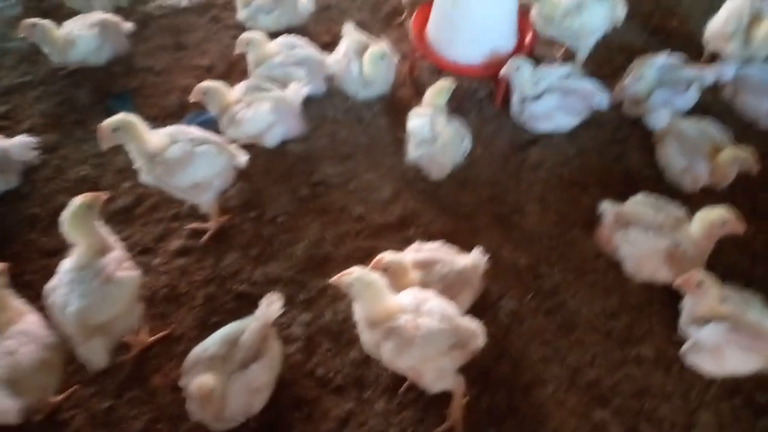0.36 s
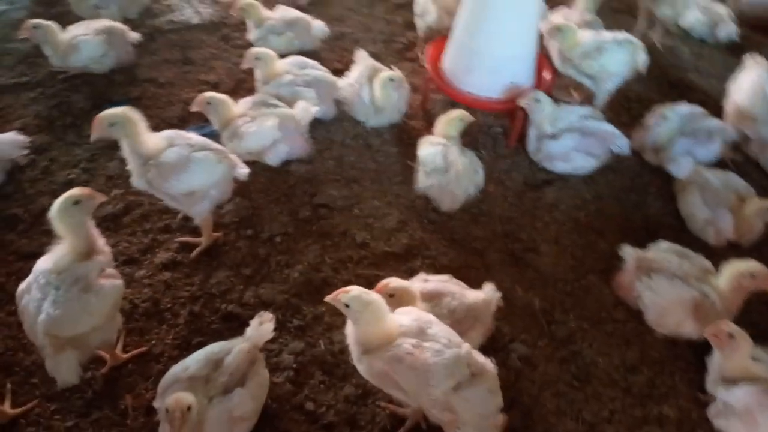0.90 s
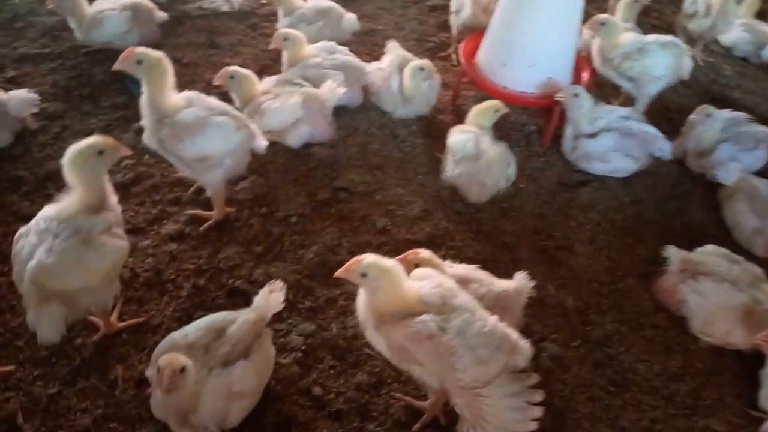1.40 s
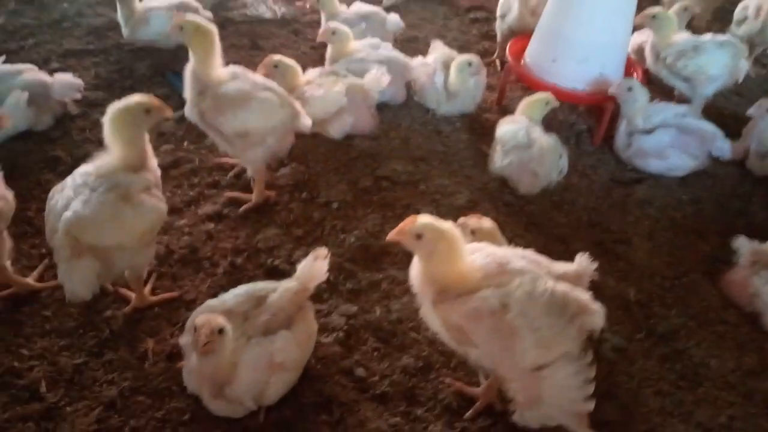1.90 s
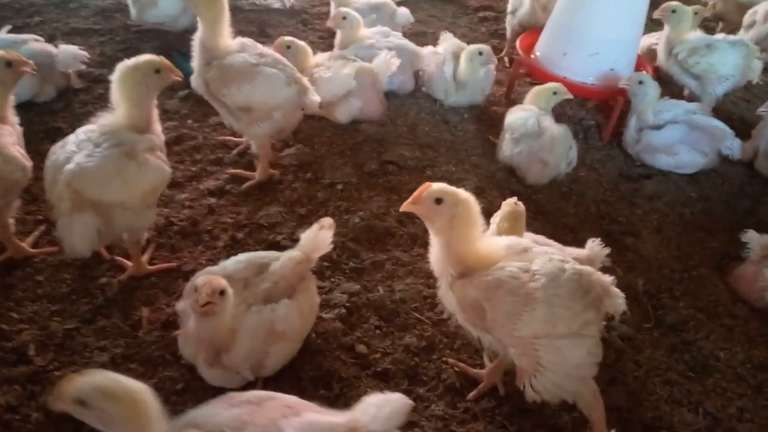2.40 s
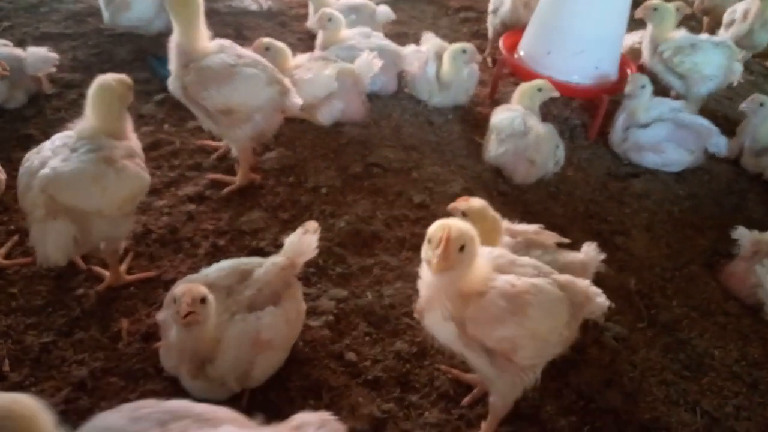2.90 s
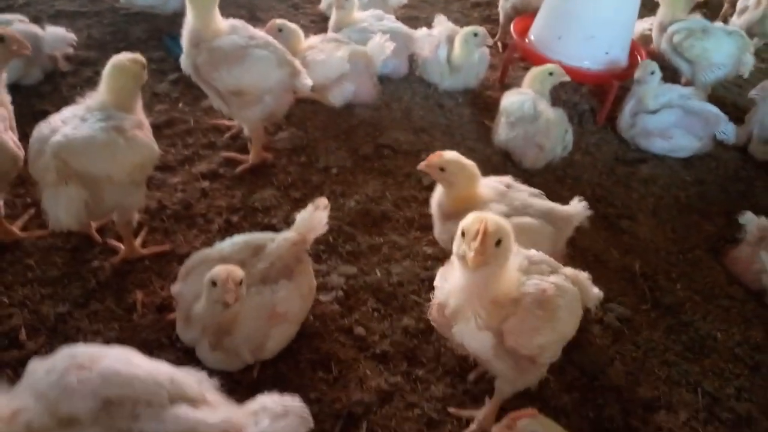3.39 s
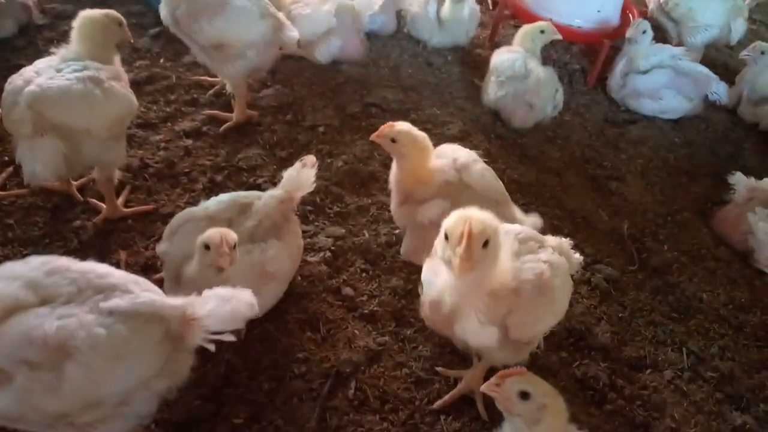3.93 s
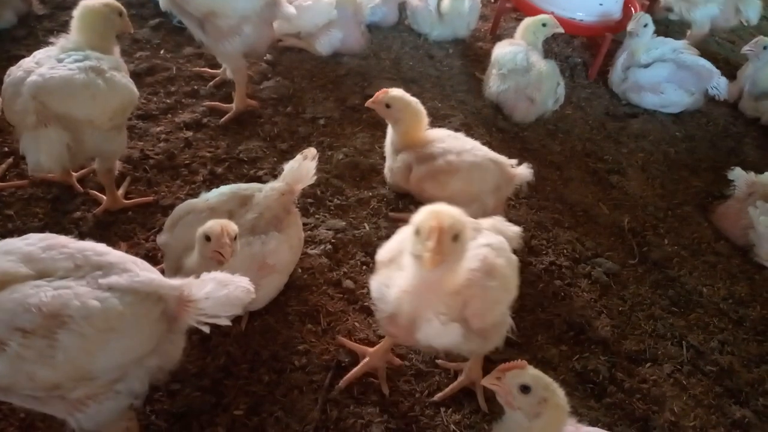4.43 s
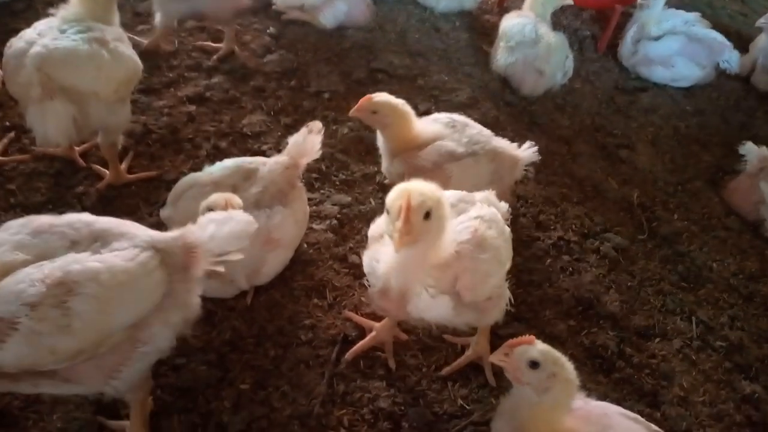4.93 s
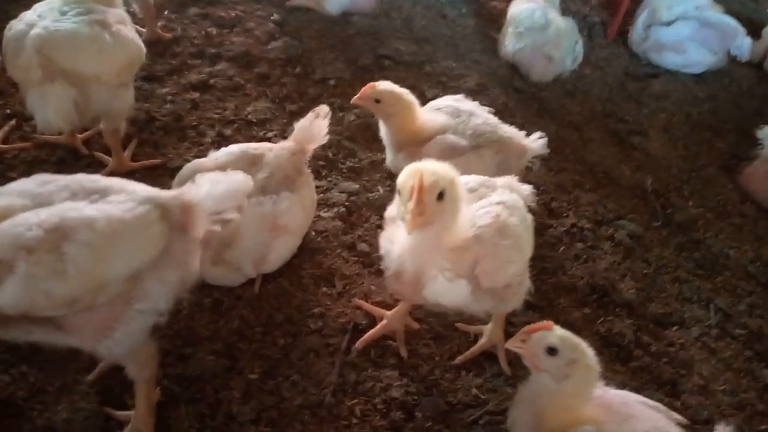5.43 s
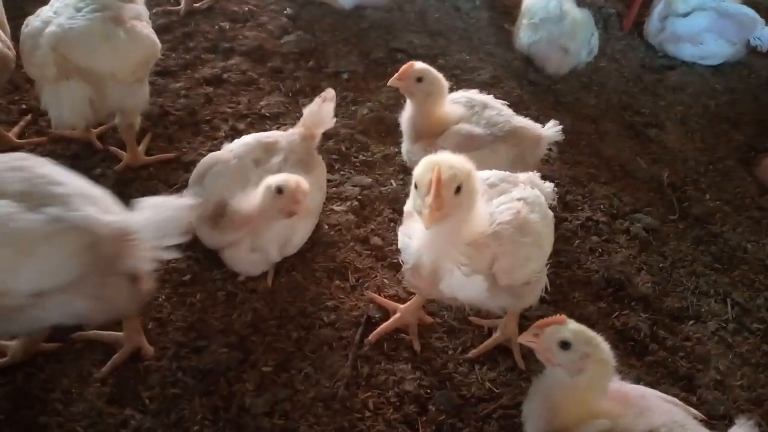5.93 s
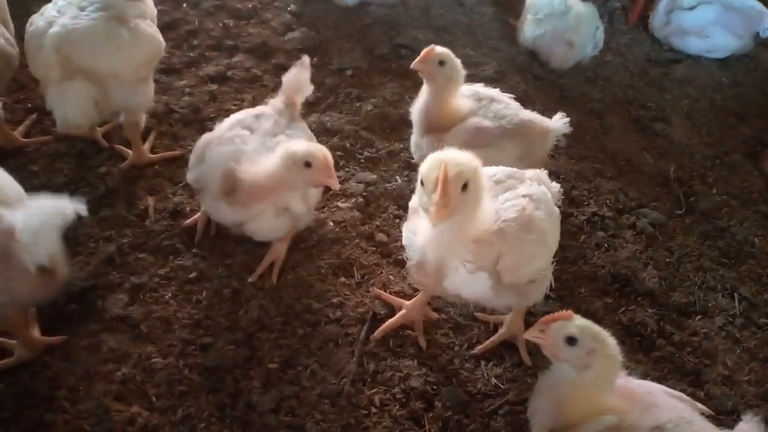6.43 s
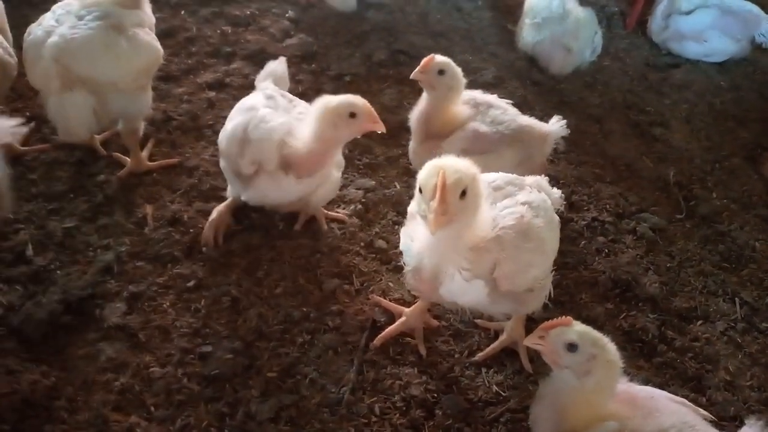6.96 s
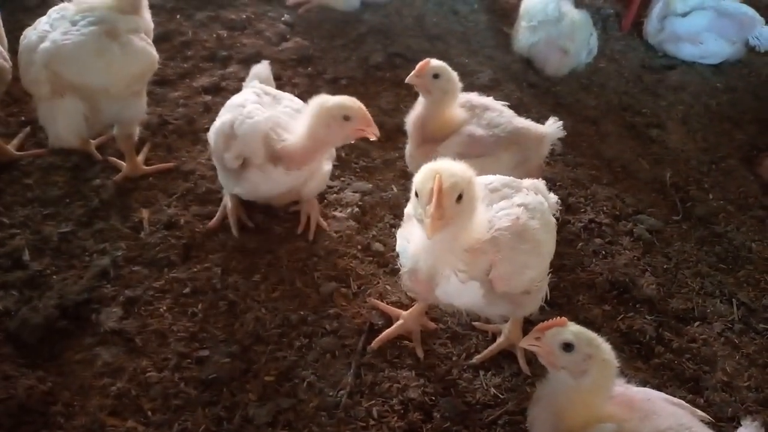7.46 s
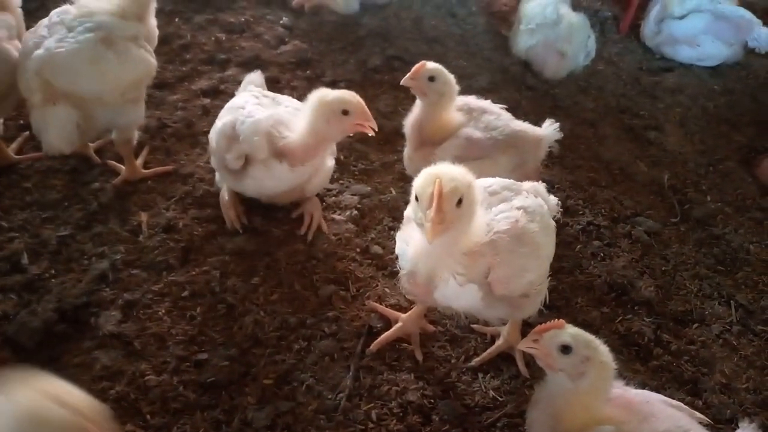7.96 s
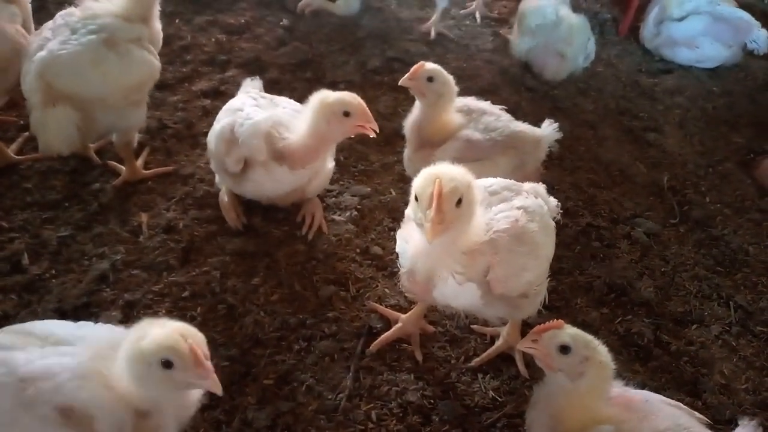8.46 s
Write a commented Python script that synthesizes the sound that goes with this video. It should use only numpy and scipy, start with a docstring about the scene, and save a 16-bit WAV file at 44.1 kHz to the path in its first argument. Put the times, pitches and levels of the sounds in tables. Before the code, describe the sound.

A flock of young chickens peeps throughout in a farm shed, its distant blur of tiny falling whistles swelling and briefly dipping over faint low air and hiss. From 0 to 1 s, thin quick cheeps sound nearer, with a barely audible low hoot. From 1 to 2.2 s, soft body thuds, feather and litter rustles and small knocks mix with hoarse, rapidly fluttering trills. A clearer trill comes at 2.6 s, then a lull. Between 3.2 and 4.9 s, sharp short clucks punctuate rough trills and peeps. At 5.0 a longer trill leads into the busiest moment, 5.3 to 5.7 s, with strong clucks and bumps. Around 6 to 6.8 s come more soft knocks and dry rustling. Then sparse peeps, a faint low purr near 7 s and distant hoots near 8 s, ending with a knock at 8.4 and a louder cluster of cheeps at 8.55 s.

```python
"""A blur of small voices in a farm shed, then young chicks peeping, clucking and trilling near the microphone.
Peeps and clucks are short bent glides; trills dip fifty times a second and grow hoarse with half-pitch lines.
The far flock is 900 small peeps blurred by the shed. Noise makes the rustling litter, the air and the hiss;
damped sines make soft knocks, short noise bursts dry ticks. A low bird hoots and purrs faintly far off."""
import sys
import numpy as np
from scipy import signal
from scipy.fft import rfft, irfft
from scipy.io import wavfile
from scipy.ndimage import uniform_filter1d

SR = 44100
rng = np.random.default_rng(int(sys.argv[2]) if len(sys.argv) > 2 else 0)


def volts(x):
    """Linear amplitude factor 10**(x/20) for a level x in dB, scalar or array-like."""
    e = np.asarray(x, float) / 20
    return 10 ** e


def materialize(psi):
    """Save the field psi as 16-bit PCM at rate SR to the path in sys.argv[1].

    A 1-D psi becomes a single channel; in a 2-D psi each row is a channel.
    """
    bounded = np.clip(np.atleast_2d(psi).T, -1, 1)
    quanta = np.round(bounded * 32767).astype(np.int16)
    wavfile.write(sys.argv[1], SR, quanta)


N = 378819


def rms_one(x):
    """Scale to rms 1."""
    return x / np.sqrt(np.mean(np.abs(x) ** 2) + 1e-20)


def add(out, at, sound):
    """Mix a short sound in at a sample."""
    out[at:at + len(sound)] += sound[:max(N - at, 0)]


def drift(rate_hz, size):
    """Slow chance of rms 1: noise steeply low-passed at a rate."""
    sos = signal.butter(4, rate_hz, fs=SR, output="sos")
    return rms_one(signal.sosfilt(sos, rng.standard_normal(size + 3000))[3000:])


def coloured(spectrum, patchy_db):
    """Noise of a given spectrum, rms 1; bands two thirds of an octave apart flicker independently."""
    f = np.fft.rfftfreq(N, 1 / SR) + 1
    hz, level_db = np.transpose(spectrum)
    tone = rfft(rng.standard_normal(N)) * volts(np.interp(np.log(f), np.log(hz), level_db))
    knots = np.arange(N // 441 + 2)   # one every 10 ms
    out = 0
    for k in range(1, 15):
        share = np.clip(1 - np.abs(1.5 * np.log2(f / 30) - k), 0, 1)
        flicker = np.interp(np.arange(N) / 441, knots, rng.standard_normal(len(knots)))
        out = out + irfft(tone * share, N) * volts(patchy_db * flicker)
    return rms_one(out)


def swell(t, rise_s, length_s, change_db, release_s):
    """Smooth rise and release around a level that slopes in dB over the length."""
    rise = np.clip(t / rise_s, 0, 1)
    release = np.clip((length_s - t) / release_s, 0, 1)
    edges = np.sin(np.pi / 2 * rise) ** 2 * np.sin(np.pi / 2 * release) ** 2
    return edges * volts(change_db * t / length_s)


def span(rows):
    """First sample, times, end fades and the interpolated columns of a short curve."""
    s, *columns = np.transpose(rows)
    t = np.arange(round(s[0] * SR), min(round(s[-1] * SR), N)) / SR
    fade = np.clip(np.minimum(t - s[0], s[-1] - t) / 0.018, 0, 1)
    return round(s[0] * SR), t, fade, [np.interp(t, s, c) for c in columns]


def shed(x):
    """The shed's answer: a diffuse noise tail that dies away, with the energy of the sound that enters."""
    t60_s = 0.092
    t = np.arange(int(.5 * SR)) / SR
    tail = rng.standard_normal(len(t)) * volts(-60 * t / t60_s) * (t > .004)
    return signal.fftconvolve(x, tail / np.sqrt(np.sum(tail ** 2)))[:N]


def microphone_hiss():
    """Steady faint noise of the microphone, its bands flickering a little."""
    # Spectrum of the hiss. Each row: frequency in Hz, density in dB per Hz (relative).
    hiss_spectrum = [(3000, -12.5), (8000, -14.5), (13000, -17.5), (14500, -2.5), (15700, -0.5)]
    return volts(-86) * coloured(hiss_spectrum, patchy_db=2.0)


def room_air():
    """The air of the shed: mostly low noise that flickers band by band."""
    # Spectrum of the air. Each row: frequency in Hz, density in dB per Hz (relative).
    air_spectrum = [(25, -52.5), (50, -21), (80, 0), (120, -4.5), (300, -13), (600, -20), (1400, -19.5),
                    (3500, -29.5), (7000, -34.5)]
    return volts(-76) * coloured(air_spectrum, patchy_db=3.5)


def peep(length, pitch_hz, overtone_db, fall_db):
    """A whistle on a bent glide (pitch at start, middle, end) with overtones that change by fall_db each."""
    u = np.linspace(-.15, 1.15, int(1.3 * length * SR) + 2)   # runs past both ends of the length
    a, b, c = pitch_hz
    glide = a + (4 * b - 3 * a - c) * u + (2 * a - 4 * b + 2 * c) * u * u
    phase = 2 * np.pi * np.cumsum(glide) / SR
    envelope = np.sin(np.pi * np.linspace(0, 1, len(u)) ** .8) ** 1.2
    voice = envelope * np.sin(phase)
    for k in range(2, 6):
        voice = voice + envelope ** k * np.sin(k * phase) * volts(overtone_db + fall_db * (k - 2))
    return np.sqrt(2) * voice   # the whistle has rms 1 at its crest


def flock():
    """Hundreds of short falling peeps, loud and faint, blurred by the shed; one in ten is a faint low cluck."""
    # Loudness of the far flock. Each row: time in seconds, level in dB before a lift of 1.5 dB.
    flock_level = [(0, -61), (.3, -55), (.75, -58), (1.17, -62.5), (1.6, -57.5), (1.799, -63.5),
                   (2.451, -62), (3.0, -57.5), (3.2, -52.5), (3.501, -55.5), (3.7, -64), (3.95, -53.5),
                   (4.4, -54), (4.72, -59.5), (5.3, -50), (5.64, -64.5), (6.3, -59.5), (6.58, -62),
                   (6.85, -62.5), (7.05, -55), (7.4, -58), (7.77, -61), (8.2, -57.5), (8.45, -64),
                   (8.588, -44)]
    # Brief dips in the flock's level, as from a noise gate.
    # Each row: middle in seconds, half length in seconds, depth in dB.
    level_dips = [(0.186, 0.06, 29), (0.248, 0.029, 13), (1.17, 0.13, 5), (2.572, 0.044, 10.5),
                  (3.084, .1, 13.5), (3.731, 0.038, 15), (4.224, 0.04, 11), (5.528, 0.027, 29),
                  (6.222, 0.077, 18), (6.297, 0.1, 28), (6.729, 0.099, 35), (7.212, 0.12, 8.5),
                  (7.494, 0.068, 17), (7.637, 0.058, 16), (7.934, 0.072, 22), (8.224, 0.028, 14)]
    out = np.zeros(N)
    for s, length, top, fall, bend, near, kind, size in rng.random((900, 8)):
        top_hz, fall_hz = 2050 + 620 * (top + size), 750 * fall + 50
        glide = np.array([top_hz, top_hz - fall_hz * (.2 + .6 * bend), top_hz - fall_hz])
        low = kind < 1 / 10   # half the pitch, half the length
        note = peep((.018 + .04 * length) / (1 + low), glide / (1 + low), -35, -20)
        add(out, int(s * N), volts(18 * near - 12 * low) * note)
    out = out * volts(3.2 * drift(110, N))   # small throats waver
    out = out + volts(5) * shed(out)
    out /= np.sqrt(uniform_filter1d(out ** 2, size=4000)) + 1e-9   # the crowd keeps an even loudness
    t = np.arange(N) / SR
    s, level_db = np.transpose(flock_level)
    dip_db = sum(depth_db * np.clip(1 - np.abs(t - mid) / half, 0, 1) for mid, half, depth_db in level_dips)
    return out * volts(np.interp(t, s, level_db) + 1.5 - dip_db)


def hoots():
    """Far low hoots near 700 Hz: wavering sines with a faint octave."""
    # One curve per phrase. Each row: time in seconds, pitch in Hz, level in dB.
    phrases = [
        [(.1, 785, -85), (.2, 728, -80), (.26, 710, -78)],
        [(.74, 830, -88), (.87, 760, -77), (.95, 745, -89)],
        [(1.06, 810, -65), (1.2, 795, -74), (1.3, 837, -66.5)],
        [(7.52, 700, -79), (7.57, 810, -74.5), (7.62, 830, -78)],
        [(7.71, 600, -64.5), (7.76, 684, -73), (7.82, 810, -77), (7.92, 770, -77.5), (8.06, 746, -78),
         (8.15, 673, -67.5), (8.22, 556, -77)],
    ]
    out = np.zeros(N)
    for rows in phrases:
        at, t, fade, (hz, level_db) = span(rows)
        phase = 2 * np.pi * np.cumsum(hz) / SR
        waver = 1 + .7 * drift(45, len(t))
        add(out, at, fade * volts(level_db) * waver * (np.sin(phase) + .35 * np.sin(2 * phase)))
    return out


def purr():
    """A low far purr: an unsteady sine that throbs fast."""
    # Course of the purr. Each row: time in seconds, pitch in Hz, level in dB before a lift of 6.5 dB.
    purr_curve = [(6.7, 691, -66), (7.338, 632, -77.5), (7.37, 583, -99)]
    throbs_per_s, throb_peak_s = 45, 7.04
    at, t, fade, (hz, level_db) = span(purr_curve)
    throb = np.cos(np.pi * throbs_per_s * (t - throb_peak_s)) ** 2
    level = fade * volts(level_db + 6.5 + 3.5 * drift(31, len(t)))
    phase = 2 * np.pi * np.cumsum(hz + 25 * drift(40, len(t))) / SR
    out = np.zeros(N)
    add(out, at, level * throb * np.sin(phase))
    return out


def moves(rows):
    """Gain over time of a table of movements, on a floor of near silence."""
    out = np.full(N, volts(-105))
    for s, rise_s, length_s, level_db, change_db in rows:
        t = np.arange(int(length_s * SR)) / SR
        add(out, round(s * SR), volts(level_db) * swell(t, rise_s, length_s, change_db, 0.37 * length_s))
    return out


def rustles():
    """Bodies thud on the ground, feathers and husks hiss; where both sound, claws scratch in between."""
    # Bodies thud and shuffle, feathers and husks hiss. Each row: start in seconds, rise in seconds,
    # length in seconds, level in dB before the balance below, change in dB over the length.
    thuds = [(.962, 0.027, 0.22, -48, -20.5), (1.36, 0.06, 0.62, -55.5, -7.5),
             (1.94, 0.031, 0.025, -46, -12), (3.99, 0.011, 0.082, -64, -12), (4.12, 0.12, .12, -65, -6.5),
             (4.69, 0.038, 0.06, -60.5, 6), (4.76, 0.014, 0.054, -62.5, 2.5),
             (5.148, 0.02, .36, -44.5, -14), (5.5, 0.06, 0.076, -55.5, -12),
             (6.44, 0.03, 0.087, -51.5, -16), (6.65, 0.036, 0.091, -41, -37.5)]
    hisses = [(.968, 0.034, .13, -56, -34), (1.36, .03, 0.25, -82, 6.5), (1.46, .3, 0.7, -69, 1),
              (3.99, 0.024, 0.023, -73.5, -23), (4.12, 0.052, 0.042, -82, -14.5),
              (4.69, 0.023, 0.058, -90, -14), (5.86, 0.14, .42, -68, 0)]
    # Spectra of thud, hiss and scratch. Each row: frequency in Hz, density in dB per Hz (relative).
    dull_spectrum = [(50, -12), (90, -6), (300, -2.5), (520, -10.5), (800, -23.5), (1500, -35)]
    dry_spectrum = [(1200, -27), (2000, -32), (2800, -0.5), (3800, 2), (5200, -11.5), (6800, -20),
                    (8000, -63)]
    scratch_spectrum = [(300, -18.5), (700, 5), (1300, 0), (2200, 0.5), (3500, -35), (6000, -52.5)]
    thud_gain, hiss_gain = moves(thuds), moves(hisses)
    ground = volts(-5.0) * thud_gain * coloured(dull_spectrum, patchy_db=2.0)
    husks = volts(7.0) * hiss_gain * coloured(dry_spectrum, patchy_db=2.5)
    claws = volts(7.5) * np.sqrt(thud_gain * hiss_gain) * coloured(scratch_spectrum, patchy_db=5.0)
    return ground + husks + claws


def knocks():
    """Soft knocks close by: a few damped cycles with a short, dull crack of noise."""
    # Each row: start in seconds, peak in dB, pitch in Hz, crack against thud in dB before a cut of 5 dB.
    knock_rows = [(0.954, -44, 474, -6), (1.372, -49.5, 834, 4), (1.558, -43.5, 380, 22.5),
                  (1.712, -49.5, 369, -26), (1.737, -41.5, 388, 3.5), (1.888, -47.5, 342, -13.5),
                  (1.945, -47.5, 724, 1.5), (2.074, -57, 236, -9), (2.105, -49.5, 350, -22),
                  (2.134, -49.5, 287, 3), (3.646, -45, 354, -14.5), (4.01, -56.5, 390, -3),
                  (4.151, -50, 186, -29), (4.166, -49, 192, -31), (4.564, -53, 400, -18),
                  (4.706, -46.5, 355, 10), (5.328, -41.5, 270, -3.5), (5.386, -33, 332, -26),
                  (5.408, -33, 190, -4), (5.518, -46, 346, -14), (5.929, -44.5, 340, -30),
                  (5.989, -38, 275, -23), (6.059, -48, 209, -20), (6.467, -45.5, 403, -3.5),
                  (6.539, -59, 740, -12), (6.667, -41, 282, 1.5), (6.825, -40.5, 300, -4),
                  (8.429, -42.5, 392, -1)]
    out, t = np.zeros(N), np.arange(1500) / SR
    dull = signal.butter(2, 2500, fs=SR, output="sos")
    for s, peak_db, hz, bright_db in knock_rows:
        thud = np.sin(2 * np.pi * hz * t) * np.exp(-t / 0.0026) * np.minimum(t / 0.00079, 1) * 1.22
        crack = signal.sosfilt(dull, rng.standard_normal(len(t)) * np.exp(-t / .002))
        add(out, round(s * SR), volts(peak_db) * (thud + volts(bright_db - 5) * crack))
    return out


def ticks():
    """Tiny dry ticks right at the microphone: noise that dies within milliseconds."""
    # Each row: start in seconds, level in dB before a cut of 3 dB.
    tick_rows = [(1.4216, -61), (1.5586, -49), (2.6696, -67), (2.7362, -76), (3.8482, -96), (3.873, -73),
                 (4.1425, -71), (4.367, -66), (4.6707, -64.5), (6.5412, -63.5), (8.5662, -57)]
    out, t = np.zeros(N), np.arange(600) / SR
    for s, level_db in tick_rows:
        add(out, round(s * SR), volts(level_db - 3) * rng.standard_normal(len(t)) * np.exp(-t / .001))
    return out


def throat(x):
    """Overtone resonances of the throat in parallel, signs alternating."""
    # Each row: centre in Hz, width in Hz, level in dB.
    resonances = [(3358, 750, 7.5), (4360, 380, -6.5), (5620, 570, -11), (5880, 210, -3.5),
                  (6760, 1000, -5.5), (7650, 500, -5)]
    out = 0
    for k, (hz, width, level_db) in enumerate(resonances):
        r = np.exp(-np.pi * width / SR)
        top = [(1 - r * r) / 2, 0, (r * r - 1) / 2]
        bottom = [1, -2 * r * np.cos(2 * np.pi * hz / SR), r * r]
        out = out + (-1) ** k * volts(level_db) * signal.lfilter(top, bottom, x)
    return out


def trills():
    """A whistle arches between quick dips and sags; strain adds lines at odd halves of the pitch, and rasp."""
    # Each row: first dip in seconds, length after it in seconds, top pitch in Hz before the sag,
    # dip depth in Hz, hoarseness from 0 to 1, whistle level in dB before the push in the dips,
    # change in dB from start to end, overtone level in dB.
    trill_rows = [(1.196, .09, 1960, 400, 0.7, -57, -4.5, -82),
                  (1.621, 0.088, 2370, 600, 0.9, -47.5, -4, -66),
                  (1.896, .12, 2630, 650, 0.5, -51.5, -3, -82),
                  (2.115, .135, 2650, 750, 0.52, -49.5, 1.5, -63),
                  (2.306, .07, 2580, 650, 0, -50.5, -1.5, -75.5),
                  (2.605, .175, 3088, 470, 0.01, -45, -5, -58),
                  (3.208, 0.082, 2500, 303, 0.77, -52.5, 3, -84),
                  (3.262, .235, 2656, 200, 0.53, -49.5, 1, -61.5),
                  (3.629, .045, 2296, 900, 0.5, -45, 2, -80),
                  (3.837, .065, 2743, 600, 0.8, -45.5, -3.5, -81.5),
                  (4.79, .13, 2673, 450, .7, -42, -8, -50.5),
                  (5.01, .285, 2703, 524, 0.12, -45.5, 4.5, -62),
                  (5.365, 0.17, 2413, 101, 0.06, -47.5, 1, -72),
                  (5.581, .115, 2526, 500, 0.3, -42.5, -0.5, -55),
                  (7.221, 0.14, 2768, 500, 0.9, -60.5, -0.5, -74.5),
                  (8.05, 0.028, 2910, 500, 0.8, -49, 2, -61)]
    dips_per_s = 50
    lead_s, rise_s, release_s = .016, .035, .03   # the lead comes before the first dip
    out = np.zeros(N)
    for dip_s, length, top_hz, dip_hz, hoarse, level_db, change_db, over_db in trill_rows:
        t = np.arange(int((length + lead_s) * SR)) / SR
        effort = swell(t, rise_s, t[-1], change_db, release_s)
        turn = dips_per_s * (t - lead_s) + 0.27 * hoarse * drift(15, len(t))
        dip = np.abs(np.cos(np.pi * turn)) ** 3
        sag_hz = (200 - 39 * change_db) * (t / t[-1]) ** .6   # less when the effort grows
        pitch = top_hz - sag_hz - dip_hz * dip + 120 * hoarse * drift(160, len(t))
        half_phase = np.pi * np.cumsum(pitch) / SR
        lines = []   # at 1 to 6 halves of the pitch
        for k in range(1, 7):
            raspy = hoarse if k == 2 else hoarse ** .6   # the whistle itself is rasped least
            rasp = np.sqrt(1 - raspy) + np.sqrt(raspy) * drift(290, len(t))
            lines.append(rasp * np.sqrt(2) * np.sin(k * half_phase))
        odd = np.tanh((hoarse / .07) ** 2)   # odd halves set in with slight hoarseness
        upper = 1.6 * odd * lines[2] + lines[3] + (.1 + odd) * lines[4] + .25 * lines[5]
        overtones = rms_one(throat(upper))
        half_db = -21 + 7.5 * hoarse
        voice = volts(half_db) * lines[0] + volts(4.0 * (dip + 0.24)) * lines[1]   # the dips are pushed
        sound = effort * volts(level_db) * voice + effort ** 1.4 * volts(over_db) * overtones
        add(out, round((dip_s - lead_s) * SR), sound)
    return out


def peeps():
    """Low clucks come from a wide throat and carry more overtones than thin peeps; a loud peep is brighter."""
    # Near peeps, then low clucks. Each row: start in seconds, length in seconds (fading edges reach past it),
    # pitch in Hz at the start, pitch in Hz at the end, level in dB.
    peep_rows = [(0.029, 0.032, 2960, 2000, -57), (0.198, .035, 2600, 2300, -58.5),
                 (0.265, 0.039, 2855, 2470, -54), (0.334, 0.042, 2500, 2090, -49.5),
                 (0.387, .083, 2357, 1820, -55.5), (0.457, 0.014, 3110, 1700, -52),
                 (0.551, .03, 2192, 1950, -54.5), (0.654, .033, 3110, 2100, -55.5),
                 (0.685, 0.081, 2490, 2220, -57.5), (0.813, 0.016, 2726, 2620, -50),
                 (0.825, 0.034, 2620, 2000, -52.5), (0.885, 0.013, 2375, 2140, -50.5),
                 (0.89, 0.063, 2825, 1700, -52), (1.204, 0.064, 1864, 1550, -48.5),
                 (1.337, .052, 2350, 1800, -48.5), (1.349, 0.073, 2880, 2580, -56.5),
                 (1.464, 0.051, 2360, 2040, -56.5), (1.541, 0.057, 2570, 2340, -53),
                 (1.593, .024, 2250, 2500, -49.5), (1.649, .036, 1600, 1650, -46),
                 (1.839, 0.051, 2490, 2310, -52.5), (2.035, 0.044, 2250, 2180, -51),
                 (2.256, 0.033, 2370, 2250, -53), (2.392, .018, 2164, 2110, -51.5),
                 (2.429, 0.092, 2700, 2140, -55), (2.485, 0.039, 2860, 2390, -56.5),
                 (2.921, 0.11, 2460, 2300, -56.5), (2.999, 0.073, 2590, 1870, -55.5),
                 (3.168, 0.01, 2515, 2200, -48.2), (3.176, 0.049, 2390, 1700, -51),
                 (3.537, .032, 2524, 2020, -50.5), (3.897, .013, 2376, 2100, -45.5),
                 (3.937, 0.036, 2210, 2360, -47.5), (3.98, 0.027, 2900, 2510, -60.5),
                 (4.096, 0.049, 2950, 2780, -54), (4.126, 0.0088, 2297, 2010, -43),
                 (4.251, 0.03, 2520, 2080, -47.5), (4.299, .034, 2860, 3000, -57),
                 (4.344, 0.048, 2520, 1600, -55.5), (4.406, 0.037, 2550, 2280, -47),
                 (4.41, 0.059, 2820, 2540, -51), (4.439, .022, 2095, 1880, -43),
                 (4.643, .017, 2934, 2700, -46.5), (4.66, 0.023, 2332, 1960, -41.5),
                 (4.769, .02, 2760, 2300, -51), (4.956, 0.033, 1196, 1100, -69),
                 (5.429, .012, 1934, 1600, -38), (5.96, 0.0057, 2570, 2720, -49.5),
                 (6.076, 0.025, 2620, 2470, -56.5), (6.091, 0.026, 1880, 1900, -55.5),
                 (6.233, 0.047, 2387, 2120, -53), (6.309, 0.013, 3250, 3000, -55.5),
                 (6.32, 0.05, 2590, 2060, -48), (6.563, 0.049, 2520, 2060, -57.5),
                 (6.821, 0.087, 2830, 2480, -58), (6.923, 0.045, 2850, 2300, -48.5),
                 (6.967, .024, 2010, 2480, -55), (7.044, 0.05, 2560, 2000, -63),
                 (7.066, .037, 2800, 2600, -54), (7.092, 0.0053, 2300, 2620, -59),
                 (7.102, .028, 2210, 2500, -54), (7.222, .017, 2004, 2090, -50),
                 (7.248, .018, 2110, 2070, -46.9), (7.349, 0.043, 2730, 2200, -50),
                 (7.497, 0.058, 2955, 2170, -49.5), (7.801, 0.068, 2770, 2230, -60.5),
                 (8.023, 0.013, 2560, 2880, -60), (8.062, 0.025, 2920, 2510, -50.5),
                 (8.082, 0.018, 2098, 2000, -56), (8.268, 0.038, 2660, 2210, -54),
                 (8.406, 0.053, 2416, 2220, -55.5), (8.49, 0.044, 2970, 1500, -60),
                 (8.512, .07, 1090, 1050, -62.5), (8.516, 0.032, 2210, 1900, -56.5),
                 (8.536, 0.01, 2850, 2980, -49), (8.548, .018, 2836, 2460, -53),
                 (8.555, 0.048, 2338, 2080, -39), (8.558, 0.015, 2900, 2900, -45.5)]
    cluck_rows = [(2.221, 0.016, 1545, 1750, -43), (3.241, 0.0066, 1532, 1200, -37),
                  (3.261, 0.0077, 1287, 1250, -32), (3.441, 0.0081, 1814, 1500, -41.5),
                  (3.465, 0.0075, 1726, 1680, -43), (3.62, 0.016, 1810, 1300, -55),
                  (3.644, .014, 1524, 1300, -38), (3.845, .015, 1413, 1570, -32),
                  (3.868, 0.006, 1269, 1470, -28.5), (4.114, 0.0084, 1350, 1350, -50.5),
                  (4.137, 0.01, 1350, 1450, -29.5), (4.155, 0.0079, 1317, 910, -37),
                  (4.462, 0.013, 1393, 1000, -33.5), (4.827, .012, 1338, 1600, -37.5),
                  (5.319, 0.023, 1414, 1590, -29), (5.339, .013, 1380, 1510, -28),
                  (5.386, 0.0089, 1866, 1400, -36), (5.407, 0.0063, 1452, 1700, -31),
                  (5.637, .022, 1341, 1070, -30.5)]
    notes = []
    for s, length, a, c, level_db in peep_rows:
        middle_hz = a + 0.63 * (c - a)   # most of the glide is done by the middle
        overtone_db = -26 + 20 * rng.random() ** 3 + .3 * level_db
        notes.append((s, length, (a, middle_hz, c), level_db, overtone_db, -22))
    for s, length, a, c, level_db in cluck_rows:
        middle_hz = (a + c) / 2 + 39.3   # arched above the straight glide
        notes.append((s, length, (a, middle_hz, c), level_db, -20, -8))
    out = np.zeros(N)
    for s, length, pitch_hz, level_db, overtone_db, fall_db in notes:
        note = peep(length, pitch_hz, overtone_db, fall_db)
        note = note * volts(level_db + 2.6 * drift(270, len(note)))   # slightly unsteady
        add(out, max(round((s - .15 * length) * SR), 0), note)
    return out


def scene():
    """Single birds with a little of the shed, the crowd, the litter, the knocks and the air."""
    birds = peeps() + trills() + hoots() + purr()
    shed_db = -13.5
    return (birds + volts(shed_db) * shed(birds) + flock() + rustles() + knocks() + room_air())[None]


def roll_off(x):
    """The treble ends steeply here."""
    return signal.sosfilt(signal.butter(12, 15720, fs=SR, output="sos"), x)


def record(dry):
    """The microphone takes the scene in a limited band, with ticks and hiss on top at full width."""
    low_pass = signal.cheby2(8, 45, 8200, fs=SR, output="sos")   # 45 dB down from 8200 Hz up
    high_pass = signal.butter(3, 42, "high", fs=SR, output="sos")
    band = signal.sosfilt(high_pass, signal.sosfilt(low_pass, dry))
    mix = band + ticks() + microphone_hiss()
    return roll_off(mix)


dry = scene()
out = record(dry)
materialize(out)
```